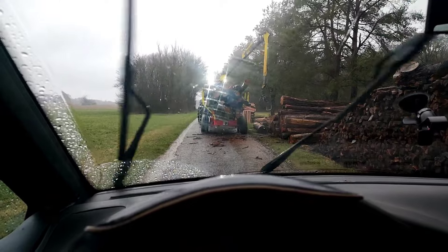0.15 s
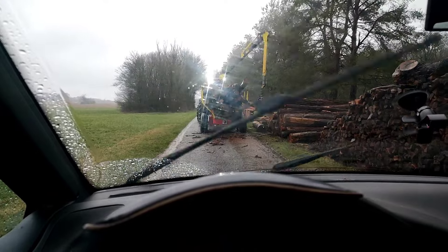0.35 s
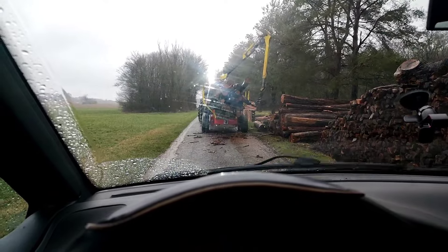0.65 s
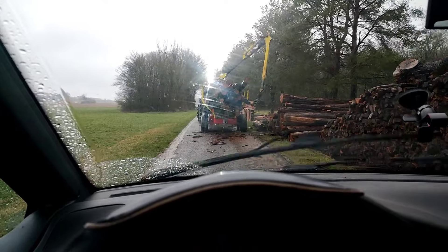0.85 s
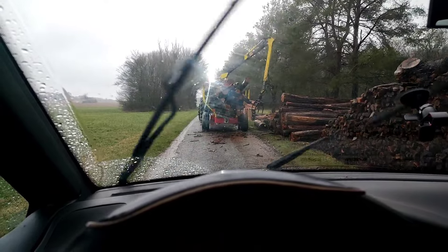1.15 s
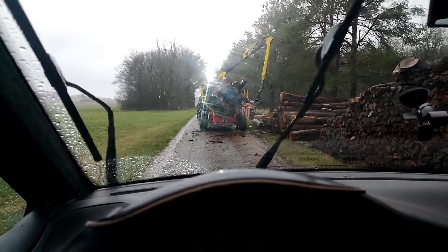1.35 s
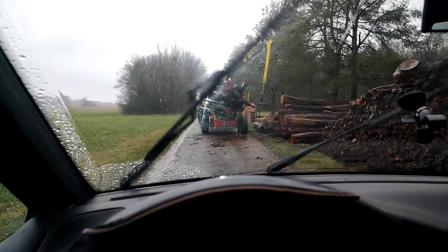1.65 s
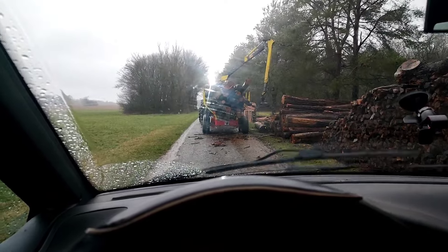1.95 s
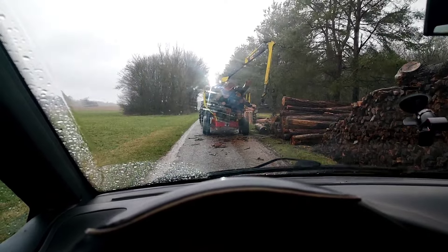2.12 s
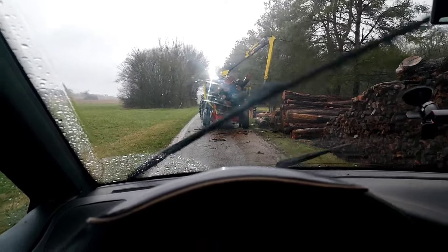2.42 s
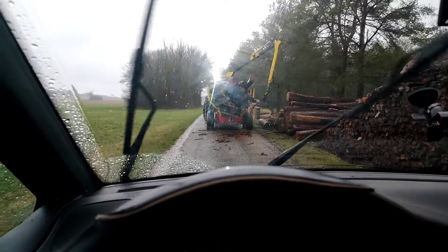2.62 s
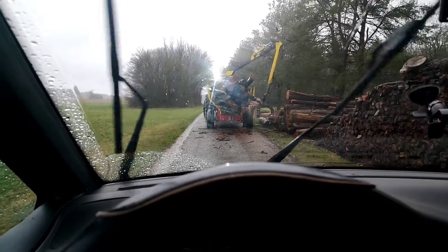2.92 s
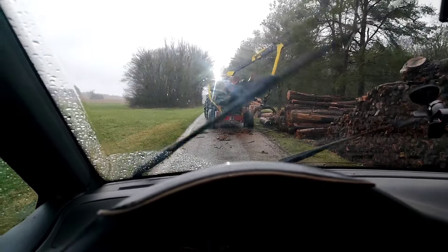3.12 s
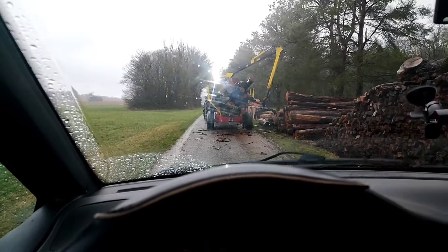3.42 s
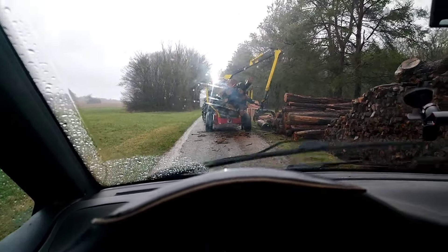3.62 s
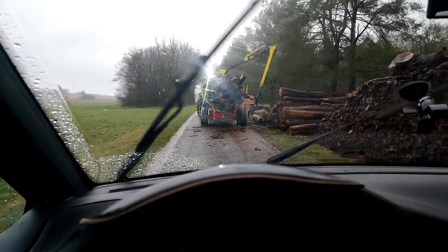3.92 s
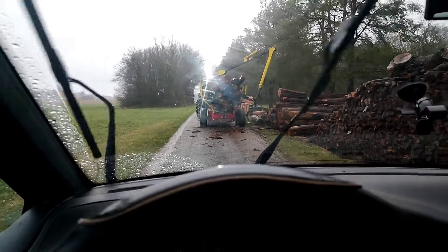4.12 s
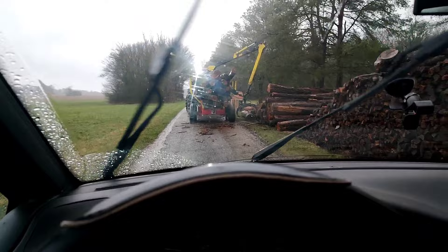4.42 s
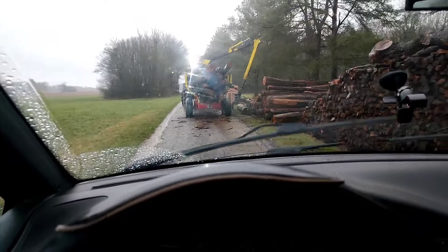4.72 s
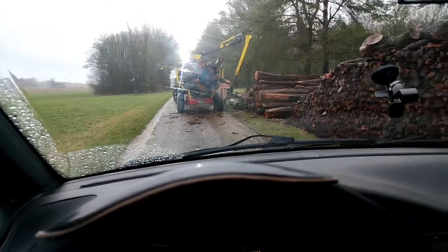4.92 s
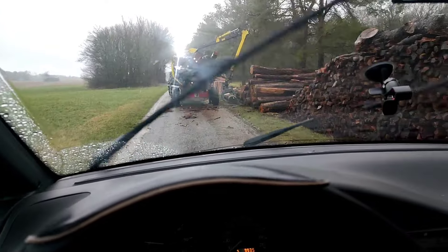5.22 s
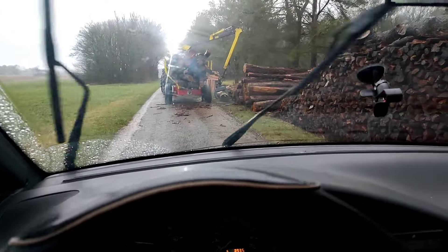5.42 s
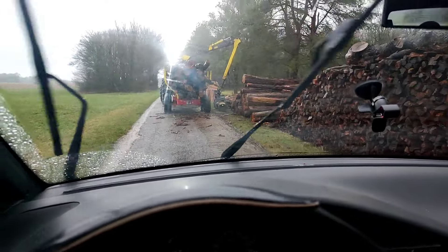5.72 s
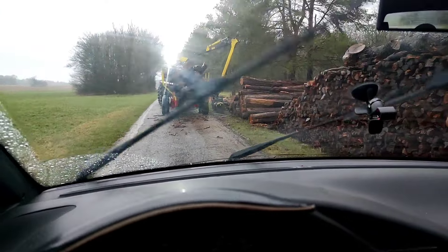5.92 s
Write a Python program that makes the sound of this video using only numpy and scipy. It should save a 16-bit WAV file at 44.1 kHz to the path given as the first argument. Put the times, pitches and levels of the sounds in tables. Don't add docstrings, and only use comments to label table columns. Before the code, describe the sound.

Inside an idling diesel car, low rumble and steady wiper thuds dominate while rain patters on roof and glass, growing heavier near the end.

```python
import sys
import numpy as np
from scipy import signal
from scipy.fft import rfft, irfft, next_fast_len
from scipy.io import wavfile
from scipy.ndimage import uniform_filter1d

SR = 44100
rng = np.random.default_rng(int(sys.argv[2]) if len(sys.argv) > 2 else 0)


def persist_wave(psi):
    counts = np.round(np.clip(psi, -1, 1) * 32767).astype(np.int16)
    wavfile.write(sys.argv[1], SR, np.atleast_2d(counts).T)


def natural_amplitude(level_db):
    exponent = np.asarray(level_db, float) / 20
    return 10 ** exponent


N = 267246


def evened(x):
    return x / np.sqrt(np.mean(x ** 2) + 1e-20)


def read(points, hz):
    table_hz, value = np.transpose(points)
    return np.interp(np.log(hz + 1), np.log(table_hz + 1), value)


def curve(rows):
    start_s, value = np.transpose(rows)
    return np.interp(np.arange(N) / SR, start_s, value)


def humps(rows, edge=3.7):
    t = np.linspace(0, N / SR, 2000)
    total = sum(height * np.exp(-abs((t - s) / max(wide_s, .02)) ** edge) for s, wide_s, height in rows)
    return np.interp(np.arange(N) / SR, t, total)


def add(mix, start_s, sound):
    part = mix[round(start_s * SR):][:len(sound)]
    part += sound[:len(part)]


def bursts(rows, length):
    return zip(rows, rng.standard_normal((len(rows), length)))


def band(x, lo_hz, hi_hz):
    sections = signal.butter(2, [lo_hz, min(hi_hz, SR / 2.2)], "band", fs=SR, output="sos")
    return signal.sosfilt(sections, x)


def coloured(x, points):
    size = next_fast_len(N)
    gain = natural_amplitude(read(points, np.fft.rfftfreq(size, 1 / SR)))
    return irfft(rfft(x, size) * gain, size)[..., :N]


# pitch_hz, likeness (0 to 1)
SAME = [(40, .96), (130, .95), (280, .74), (720, .7), (950, .4), (2400, .3), (3200, .02), (13900, 0.02)]
# pitch_hz, lag_radians
LAG = [(60, -.05), (125, .1), (700, .12), (900, .5), (1400, 2.9), (2150, 5.6), (3200, 9), (14000, 24)]


def noise(points, patchy_db, flicker_db, size=512):
    frames, hz = 4 * N // size + 5, np.fft.rfftfreq(size, 1 / SR)
    a, b, c, d, patches = rng.standard_normal((frames, len(hz), 5)).T
    patches = uniform_filter1d(patches, size=10, axis=0)
    patches = evened(uniform_filter1d(patches, size=12, axis=1))
    flicker = evened(uniform_filter1d(rng.standard_normal(frames), size=4))
    same = np.clip(read(SAME, hz), -1, 1)[:, None]
    left, stranger = a + 1j * b, c + 1j * d
    lag = np.exp(-1j * read(LAG, hz))[:, None]
    right = same * left * lag + np.sqrt(1 - same ** 2) * stranger
    level_db = read(points, hz)[:, None] + patchy_db * patches + flicker_db * flicker
    z = np.array([left, right]) * natural_amplitude(level_db)
    x = signal.istft(z, nperseg=size, noverlap=size * 3 // 4)[1][:, :N]
    return x / np.std(x.mean(0))


# pitch_hz, time to fall 60 dB (s)
CABIN = [(200, 0.036), (1000, 0.23), (4000, 0.085), (12000, 0.012)]


def cabin(x, wet_db):
    taps = rng.standard_normal((2, SR // 4))
    hz, t, z = signal.stft(taps, SR, nperseg=128)
    fade_db = -60 * t / np.maximum(read(CABIN, hz), .02)[:, None]
    tail = signal.istft(z * natural_amplitude(fade_db), SR, nperseg=128)[1]
    tail /= np.linalg.norm(tail[0])
    return x + natural_amplitude(wet_db) * signal.fftconvolve(x[None], tail, axes=1)[:, :N]


# pitch_hz, level_db (per Hz)
RUMBLE = [(15, -9.5), (28, 4), (55, -2.5), (80, -6.5), (120, -3), (160, 0), (230, -17), (320, -23.5),
          (500, -79)]
# centre_s, extra_db
TURNS = [(0.2, 6), (0.85, 4), (1.58, 5), (2.14, 6.5), (2.92, 7.5), (3.52, 6.5), (4.36, 5.5), (4.96, 4.5),
         (5.75, 3.5)]


def body_rumble():
    shudder_db = humps([(s, 0.17, db) for s, db in TURNS])
    return natural_amplitude(-46 + shudder_db) * noise(RUMBLE, 0.83, 0.84, size=2048)


# multiple of the engine cycle, level_db
ORDERS_DB = [(3, -60), (5, -46), (6, -60), (7, -57), (8, -54), (9, -64), (10, -65), (11, -54), (12, -51),
             (16, -56), (18.5, -54), (24, -65), (25, -68), (27, -63), (28, -62), (29, -71), (31, -68),
             (32, -69), (33, -69), (36, -65), (40, -64), (42, -66), (45, -68), (48, -66.5), (52, -75),
             (68, -82), (76, -81), (80, -83), (84, -84), (88, -85)]
# start_s, level_db
FIRING = [(0, -43), (1.0, -53), (2.0, -80.5), (2.35, -40.5), (3.2, -45.5), (3.5, -41), (3.75, -42.5),
          (3.95, -39.5), (4.68, -42.5), (4.82, -66), (5.1, -47.5), (6.06, -61)]


def engine():
    cycle_hz = 8.424
    turns = 2 * np.pi * cycle_hz * np.arange(N) / SR
    out = natural_amplitude(curve(FIRING)) * np.cos(4 * turns)
    knots = np.arange(0, N + SR, SR // 5)
    for multiple, level_db in ORDERS_DB:
        waver_db = 1.4 * np.interp(np.arange(N), knots, rng.standard_normal(len(knots)))
        out += natural_amplitude(level_db + waver_db) * np.cos(multiple * turns + 2 * np.pi * rng.random())
    return np.sqrt(2) * out


# start_s, peak_db, pitch_hz (of the panel), fade_s
FLIPS = [(0.032, -29.5, 92, 0.016), (0.127, -22.5, 117.5, 0.029), (0.713, -26.5, 142.6, 0.028),
         (0.805, -25.5, 141.5, 0.034), (1.399, -34.5, 153.3, 0.044), (1.435, -28, 155.7, 0.04),
         (1.512, -24.5, 120, 0.043), (1.666, -35, 150.3, 0.047), (2.117, -25.5, 151, 0.027),
         (2.2, -28.5, 171.5, 0.027), (2.827, -24.5, 147, 0.022), (2.916, -20, 107, 0.022),
         (3.373, -37.5, 113, 0.07), (3.513, -24.5, 158.3, 0.022), (3.589, -30, 111.6, 0.025),
         (4.222, -25.5, 138, 0.024), (4.308, -20.5, 106.3, 0.022), (4.665, -32.5, 150, 0.027),
         (4.911, -26, 165, 0.023), (4.965, -28, 141.5, 0.034), (5.617, -26.5, 162.5, 0.021),
         (5.697, -27, 136, 0.02), (5.714, -21, 125, 0.027)]


def wiper_thuds():
    t, out = np.arange(6000) / SR, np.zeros(N)
    for (start_s, peak_db, pitch_hz, fade_s), jolt in bursts(FLIPS, len(t)):
        swell = (1 - np.exp(-(t / 0.012) ** 2)) * np.exp(-t / max(fade_s, .008))
        rattle = 0.29 * evened(band(jolt, 87, 234.5))
        panel = np.sin(2 * np.pi * pitch_hz * t) + rattle
        add(out, start_s - .009, natural_amplitude(peak_db + 1.0) * swell * panel)
    return out


# start_s, peak_db, low_db (extra low body)
KNOCKS = [(0.037, -57.5, 25.5), (0.117, -39.5, -3), (0.731, -33.5, -4), (0.8, -37.5, -2), (0.817, -49, 15),
          (1.493, -47.5, 15), (1.527, -51, 9), (2.128, -39, -9), (2.201, -43, 12), (2.827, -47, -4),
          (2.914, -42, 0), (3.521, -44, -6), (3.601, -42.5, 13.5), (4.303, -42.5, 5.5), (4.915, -40, 6),
          (4.997, -44, 19), (5.624, -46, 4), (5.686, -43.5, 15), (5.71, -50, 16)]


def linkage_knocks():
    t, out = np.arange(6000) / SR, np.zeros(N)
    shape = (1 - np.exp(-t / .003)) * np.exp(-t / 0.019)
    for (start_s, peak_db, low_db), jolt in bursts(KNOCKS, len(t)):
        knock = evened(band(band(jolt, 330, 1000), 300, 1200))
        low = natural_amplitude(low_db + 0.5) * evened(band(jolt, 230, 400))
        add(out, start_s, natural_amplitude(peak_db - 11.5) * (knock + low) * shape)
    return cabin(out, -9)


# pitch_hz, level_db (per Hz)
RUBBER = [(3300, -33), (3500, -1), (3600, -2), (3800, -12), (4100, -22), (4230, -7), (4350, 4), (4550, -48)]
# centre_s, half_width_s, level_db
SINGS = [
    (0.04, 0.1, -79),
    (2.79, .16, -75),
]


def rubber_squeal():
    strength = humps([(s, wide_s, natural_amplitude(db)) for s, wide_s, db in SINGS], edge=1.7)
    return strength * noise(RUBBER, 0.69, 0.93, size=1024)


# pitch_hz, level_db (per Hz)
SWISH = [(2500, -28), (3000, 0), (3300, -1), (3600, -6), (4300, -39)]
# centre_s, half_width_s, level_db
SWISHES = [
    (.45, 0.12, -74),
    (3.3, .1, -79),
    (4.7, .1, -78),
    (5.98, 0.17, -70),
]


def water_swish():
    strength = humps([(s, wide_s, natural_amplitude(db)) for s, wide_s, db in SWISHES])
    return strength * noise(SWISH, 0.97, 1.6)


def wipers():
    return wiper_thuds() + linkage_knocks() + rubber_squeal() + water_swish()


# pitch_hz, level_db (per Hz)
DRUM = [(120, -24.5), (220, -3), (300, -6), (360, -4), (460, -6.5), (600, -12.5), (730, -12.5), (1000, -20),
        (1400, -22), (2200, -52)]


def roof_drum():
    return natural_amplitude(-56) * noise(DRUM, 0.71, 1.15, size=1024)


# centre_s, half_width_s, extra_db
SHEETS = [(0.03, 0.1, 5), (.52, 0.053, 1), (.8, 0.063, 2), (1.03, 0.037, 3), (1.3, .12, 2),
          (1.85, 0.22, 1.5), (2.8, .12, 9.5), (3.0, .03, 6), (4.19, .08, 3), (4.6, 0.13, 11),
          (4.8, .05, 11), (4.95, 0.09, 5), (5.25, 0.15, 6), (5.52, 0.11, 12), (5.75, .07, 10),
          (5.94, 0.14, 14)]


def water_sheets():
    fizz = noise([(3000, -27), (4500, 0.5), (6500, 3.5), (8500, -5), (11000, -35)], 1.6, 2.1, size=256)
    spray = noise([(6000, -25), (9000, 1.5), (12000, 7), (14200, 4.0)], 1.5, .8, size=256)
    sheet_db = humps(SHEETS)
    return natural_amplitude(-87.5 + sheet_db) * fizz + natural_amplitude(-85.5 + 0.64 * sheet_db) * spray


# start_s, peak_db, pitch_hz (of the ring)
DROPS = [(0.5345, -47, 2600), (0.8167, -56, 2390), (1.008, -41.5, 1490), (1.3716, -46, 2580),
         (1.535, -51, 2400), (1.961, -49, 2440), (2.586, -47, 3300), (2.632, -41, 3020),
         (2.8305, -49, 2610), (3.324, -55, 2370), (3.5229, -46, 2030), (3.5946, -51, 2400),
         (3.6712, -45, 2720), (3.918, -48, 2430), (4.114, -48, 2400), (4.3166, -48, 2340),
         (4.561, -44, 2720), (4.6062, -48, 2420), (4.6507, -45, 2700), (4.794, -41, 2340),
         (4.9177, -42.5, 2400), (5.072, -45, 2430), (5.268, -44, 2000), (5.327, -51, 2480),
         (5.4073, -47, 1450), (5.5393, -45, 3040), (5.6052, -49, 2580), (5.647, -53, 1850),
         (5.681, -45, 2500), (5.7112, -49, 1870)]


def big_drops():
    t, out = np.arange(1500) / SR, np.zeros(N)
    rise = 1 - np.exp(-t / 0.00035)
    for (start_s, peak_db, pitch_hz), spit in bursts(DROPS, len(t)):
        fuzz = .8 * evened(band(spit, .75 * pitch_hz, 1.33 * pitch_hz))
        ring = (np.sin(2 * np.pi * pitch_hz * t) + fuzz) * np.exp(-t / .0022)
        slap = .45 * evened(band(spit[::-1], 1200, 4500)) * np.exp(-t / .002)
        add(out, start_s, natural_amplitude(peak_db - 8) * (ring + slap) * rise)
    return out


# start_s, peak_db
SPLASHES = [(0.6928, -62), (0.7422, -67), (0.8126, -57), (1.5364, -59), (1.6526, -64), (1.9604, -59),
            (2.587, -58), (2.6978, -69), (3.3238, -74), (4.118, -63), (4.2682, -59), (4.3615, -69),
            (4.5625, -62), (4.6054, -62), (4.685, -52), (4.792, -56), (4.8539, -58), (4.935, -52),
            (5.1452, -71), (5.46, -60), (5.5403, -59), (5.5827, -64), (5.6785, -64), (5.8326, -63)]


def splashes():
    t, out = np.arange(1500) / SR, np.zeros(N)
    shape = np.exp(-t / 0.0042) * (1 - np.exp(-t / 0.00035))
    for (start_s, peak_db), spit in bursts(SPLASHES, len(t)):
        add(out, start_s, natural_amplitude(peak_db - 10.5) * evened(band(spit, 3000, 14000)) * shape)
    return out


def patter(per_s, spread_db):
    count, t = 24, np.arange(600) / SR
    falls = rng.random(N) < per_s / SR
    size = natural_amplitude(spread_db * np.minimum(rng.exponential(1, N), 3.5)) * falls
    spot, out = rng.integers(0, count, N), np.zeros(N)
    for k, pitch_hz in enumerate(np.geomspace(700, 13000, count)):
        ring = np.exp(-t * pitch_hz / 1.56) * np.sin(2 * np.pi * pitch_hz * t)
        ring[0] = 0.74
        out += signal.oaconvolve(size * (spot == k), ring / np.linalg.norm(ring))[:N]
    return coloured(out, [(700, -13.5), (13000, 0.0)])


# pitch_hz, level_db (per Hz)
RAIN = [(600, -27), (1000, -5.5), (1400, -9), (1750, -10), (2100, -10), (2450, -8), (2930, -11),
        (3500, -14.5), (5000, -21.5), (7600, -30.5), (10000, -35.5), (14200, -34.5)]
# start_s, level_db
SHOWER = [(0, -67), (.8, -66), (1.2, -67), (2.0, -64.5), (2.5, -67.5), (2.82, -64.5), (3.0, -67),
          (4.0, -66.5), (4.2, -64), (4.4, -65), (4.9, -62.5), (5.1, -64), (5.3, -62.5), (5.4, -64),
          (5.66, -64.5), (6.06, -63)]


def shower():
    near = coloured(cabin(patter(per_s=460, spread_db=4.5), 8.5), RAIN)
    near /= np.std(near.mean(0))
    wash = noise(RAIN, 0.93, 2.22, size=256)
    first_down_s, sweep_s = 0.45, 1.39
    push_db = humps([(first_down_s + k * sweep_s, 0.11, 1.5) for k in range(5)])
    return natural_amplitude(curve(SHOWER) + push_db) * (natural_amplitude(-1) * wash + natural_amplitude(-5.5) * near)


def rain():
    return roof_drum() + water_sheets() + cabin(big_drops() + splashes(), -4) + shower()


def scene():
    return body_rumble() + engine() + wipers() + rain()


# pitch_hz, left_minus_right_db
LEAN = [(60, .6), (200, .8), (370, .4), (670, -.5), (1240, -3), (2260, -7.5), (4140, -8), (7590, .5),
        (13900, -3)]


def two_microphones(dry):
    left = coloured(dry[0], [(hz, db / 2) for hz, db in LEAN])
    right = coloured(dry[1], [(hz, -db / 2) for hz, db in LEAN])
    return np.array([left, right])


def low_pass(x):
    return signal.sosfilt(signal.butter(12, 14490, fs=SR, output="sos"), x)


def record(dry):
    edge = signal.firwin(1023, 14250, window=("kaiser", 9), fs=SR)
    mix = signal.oaconvolve(two_microphones(dry), edge[None], "same")
    return low_pass(mix)


dry = scene()
out = record(dry)
persist_wave(out)
```